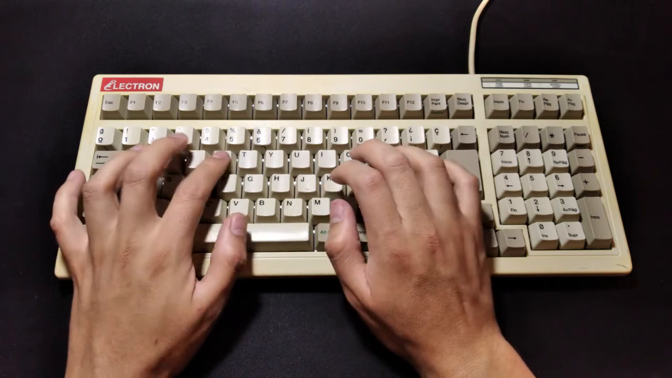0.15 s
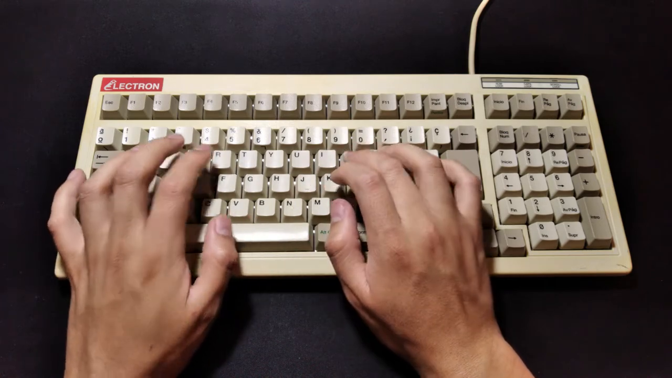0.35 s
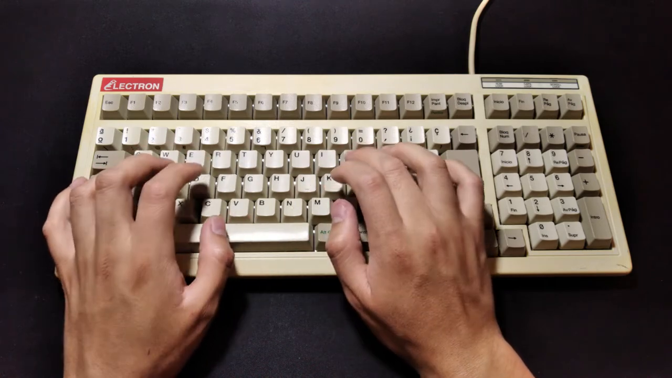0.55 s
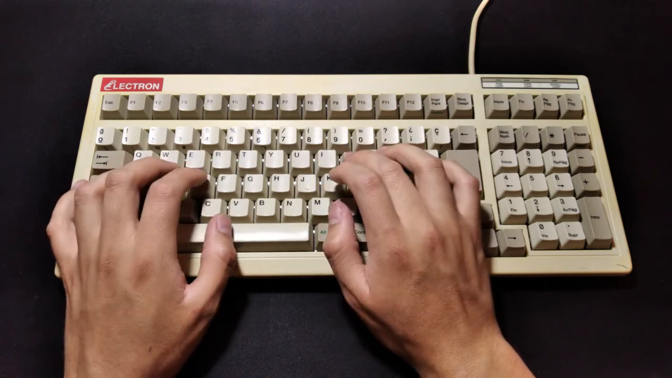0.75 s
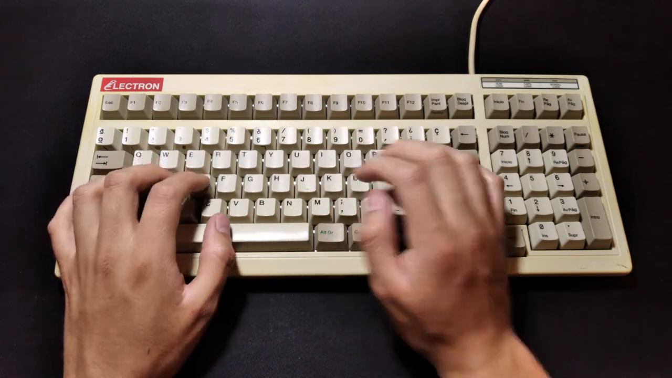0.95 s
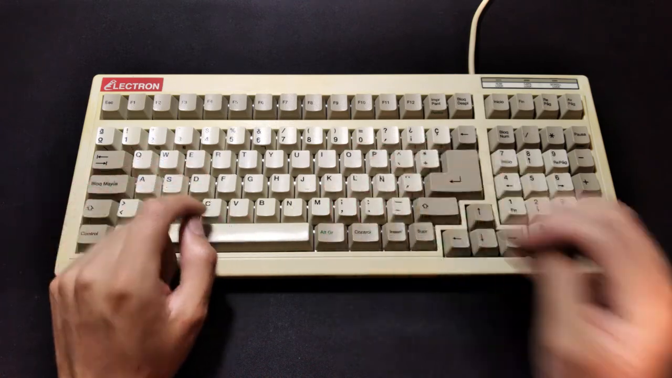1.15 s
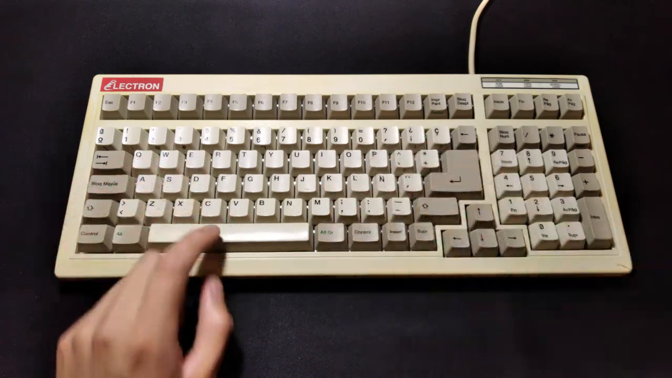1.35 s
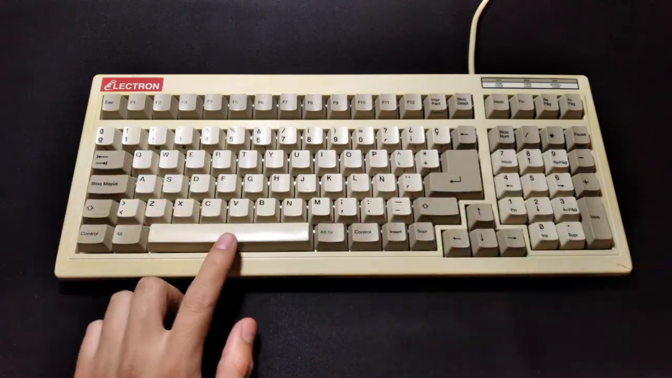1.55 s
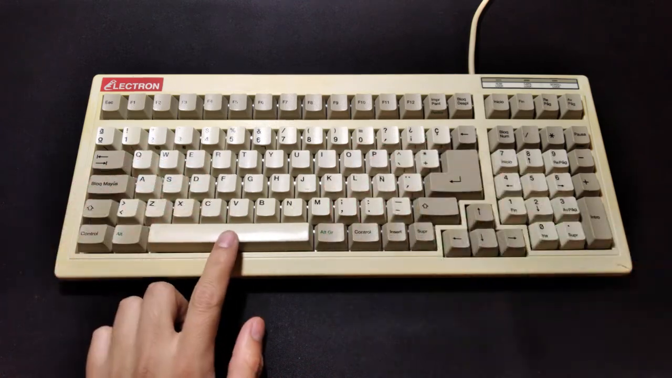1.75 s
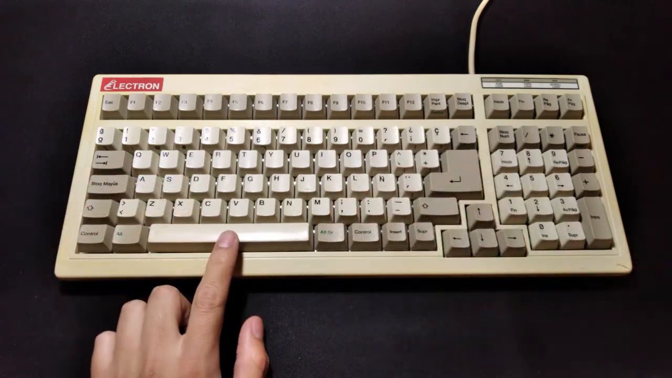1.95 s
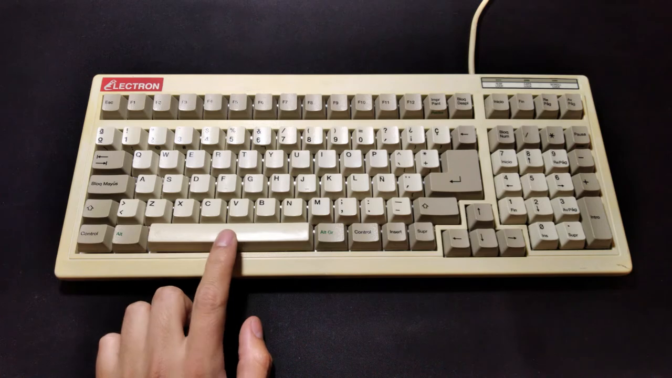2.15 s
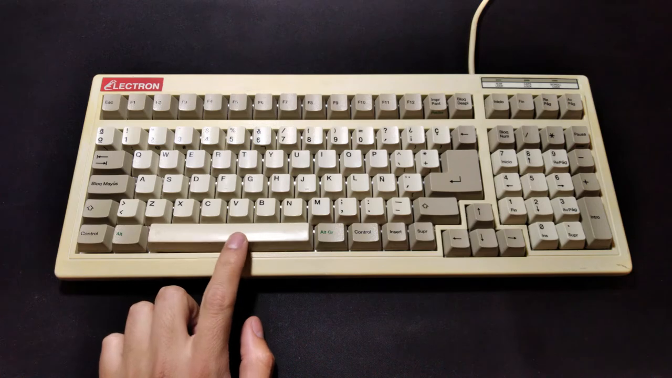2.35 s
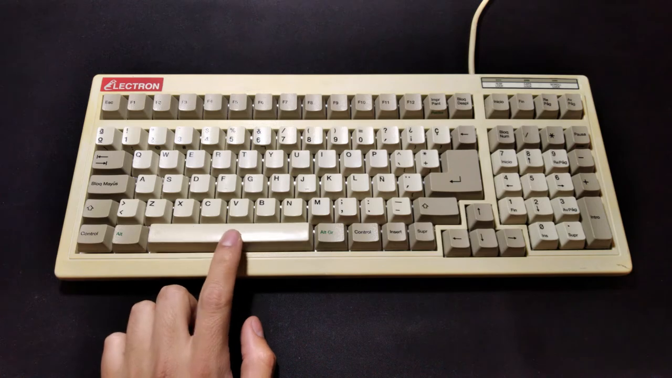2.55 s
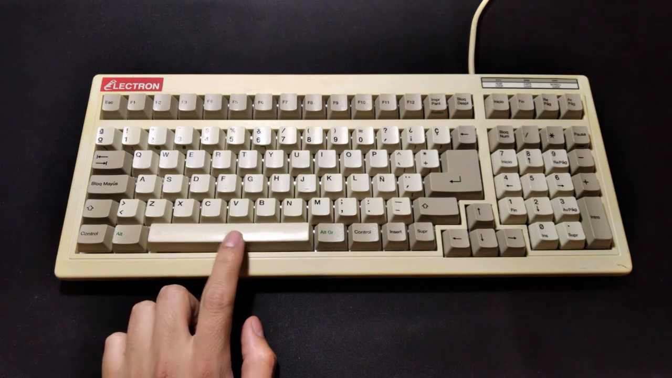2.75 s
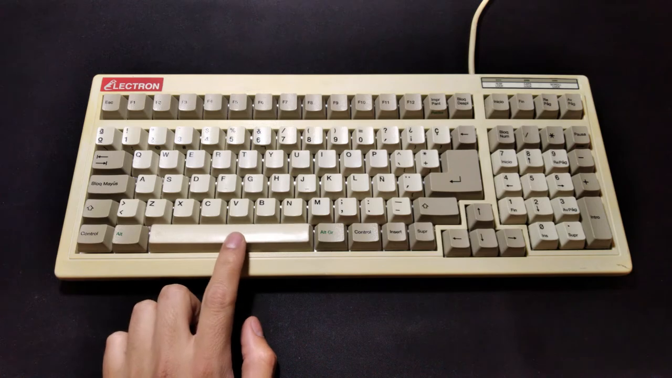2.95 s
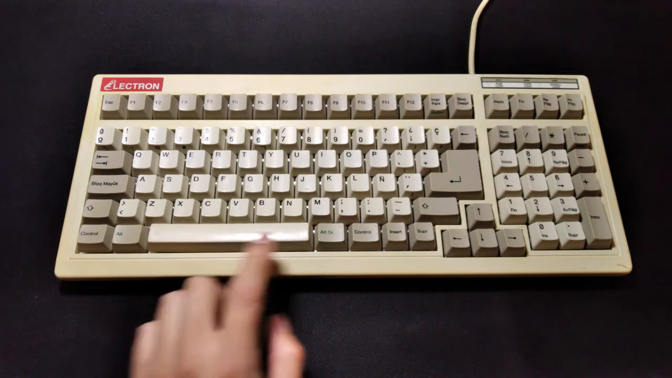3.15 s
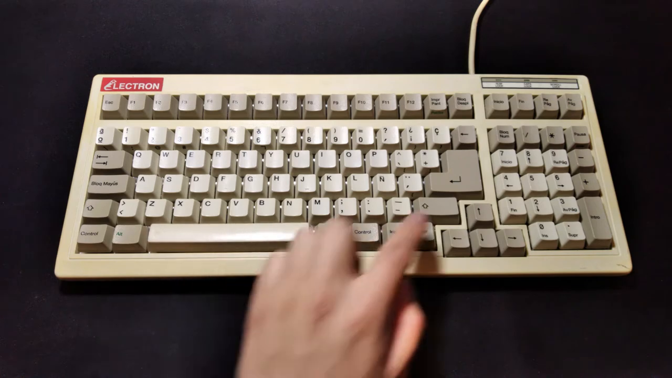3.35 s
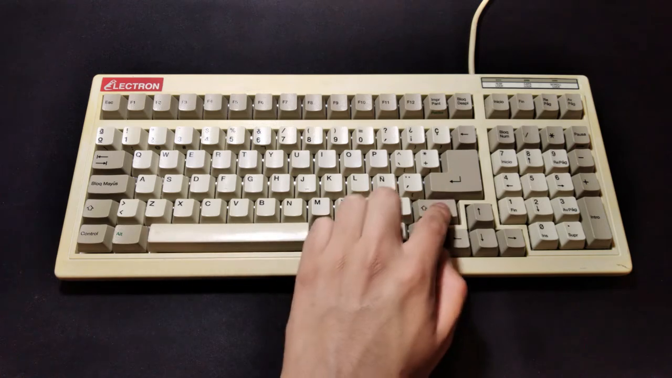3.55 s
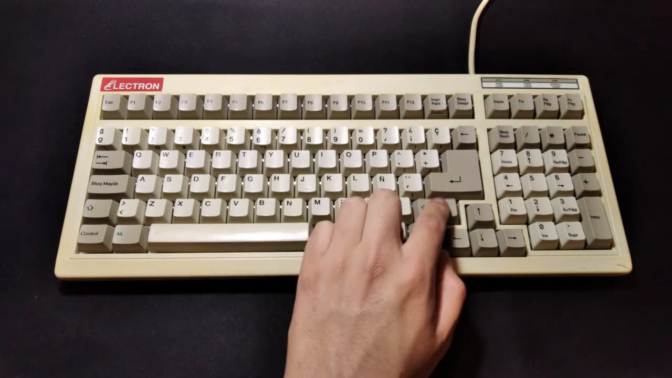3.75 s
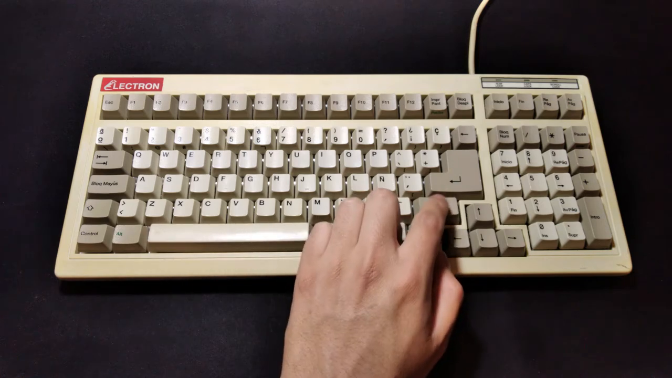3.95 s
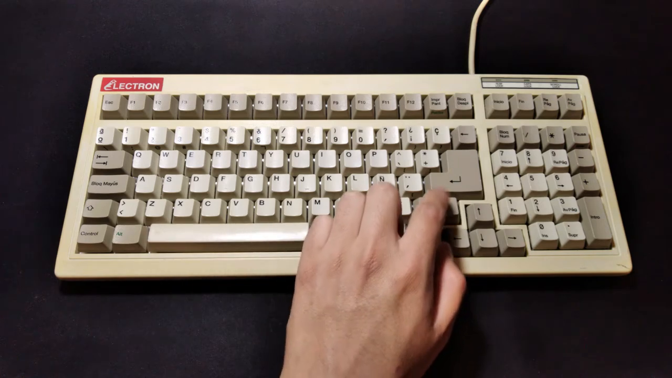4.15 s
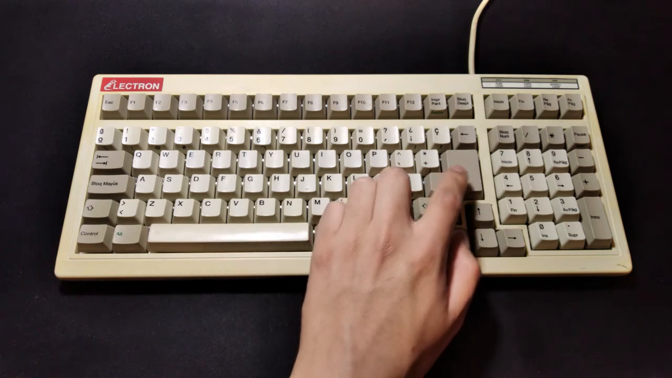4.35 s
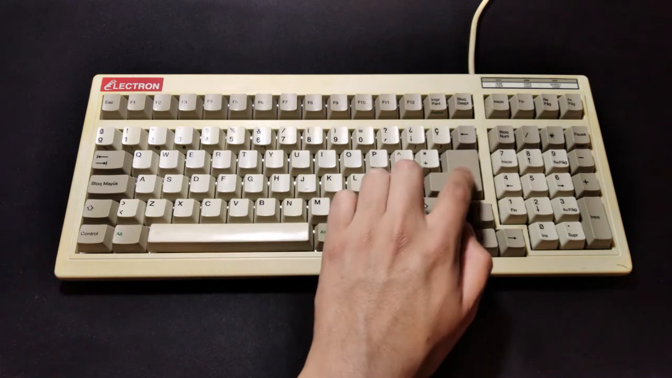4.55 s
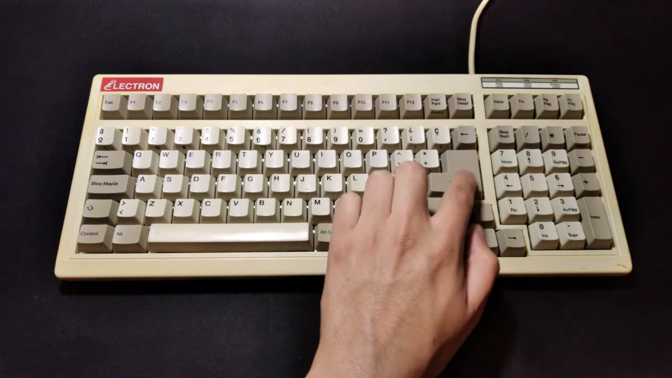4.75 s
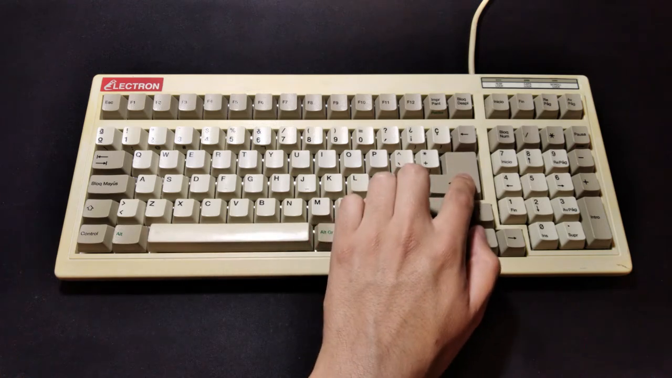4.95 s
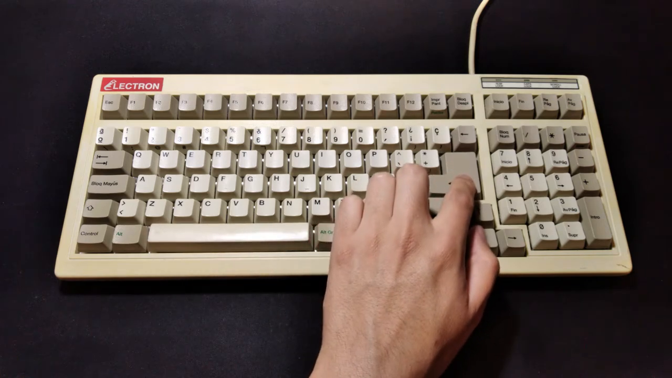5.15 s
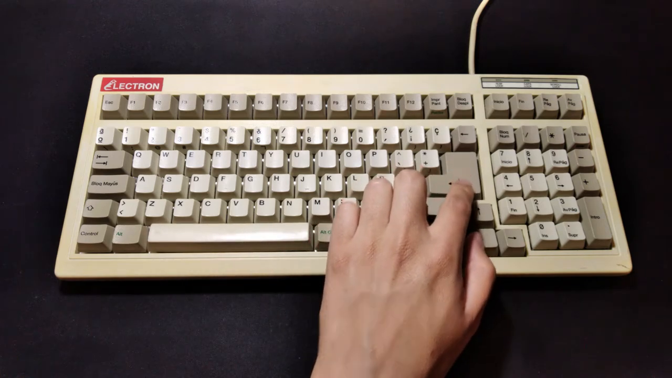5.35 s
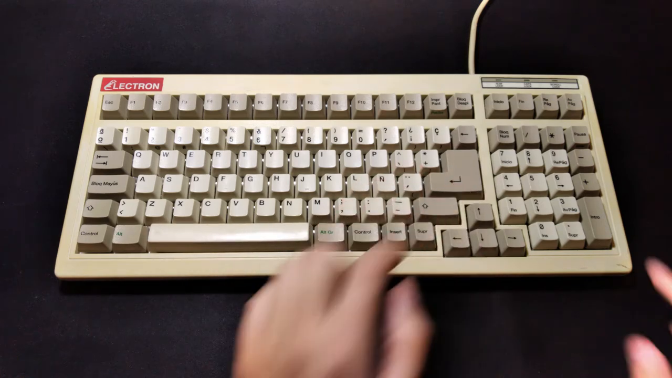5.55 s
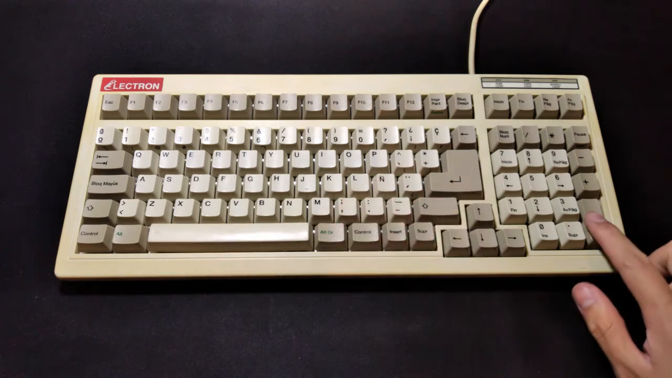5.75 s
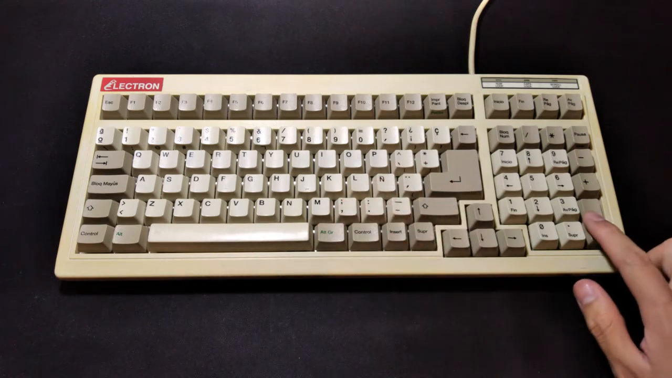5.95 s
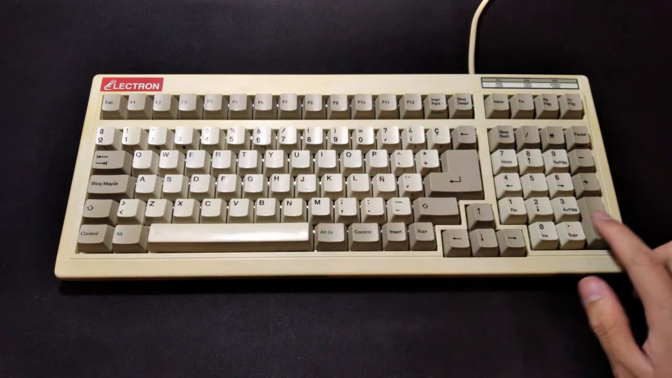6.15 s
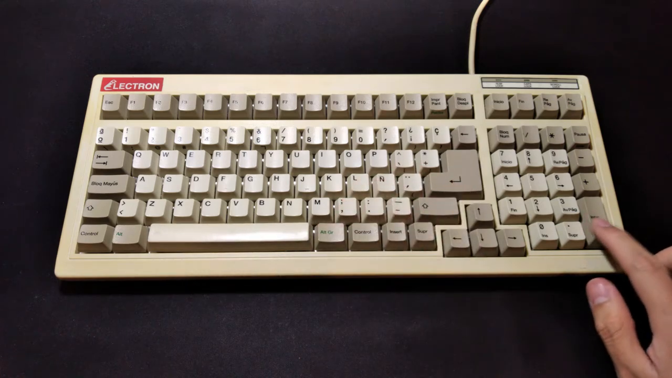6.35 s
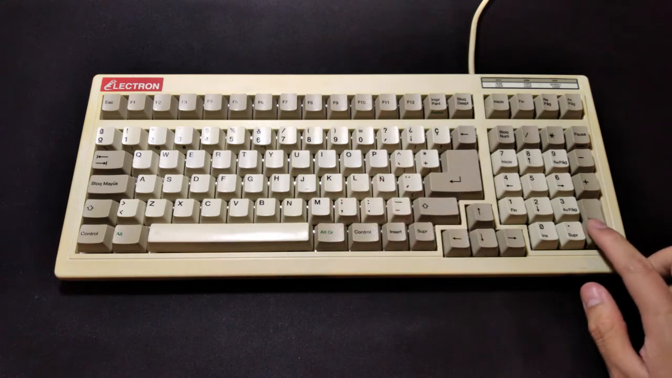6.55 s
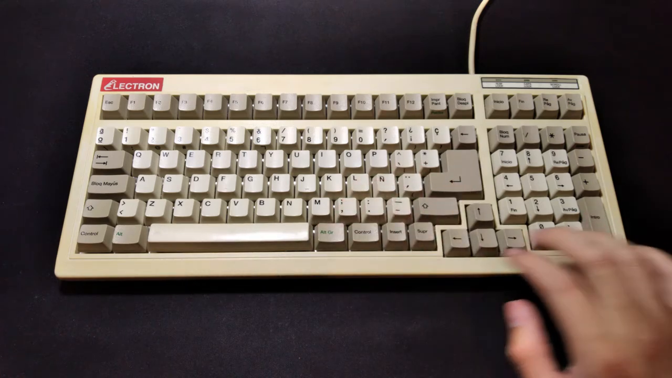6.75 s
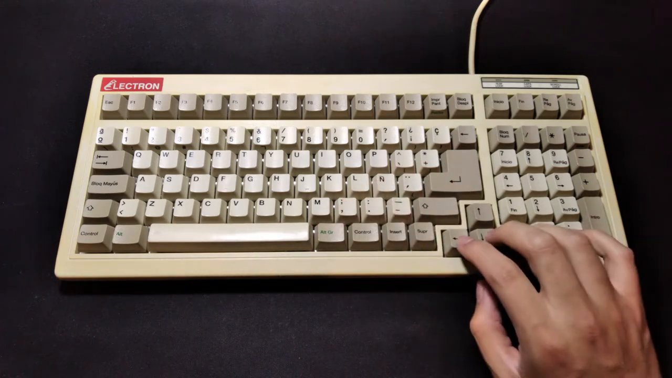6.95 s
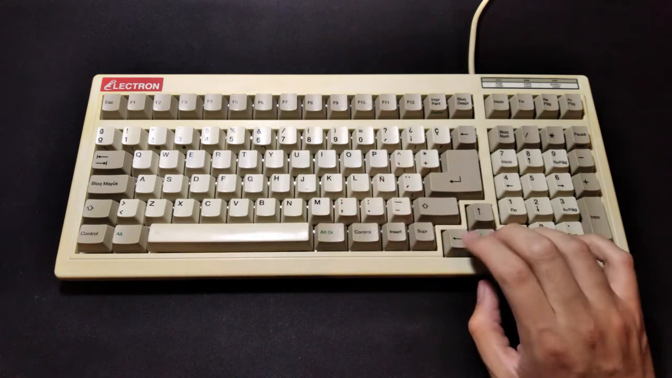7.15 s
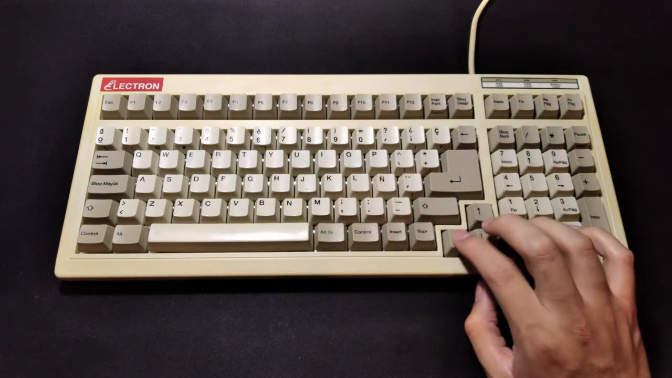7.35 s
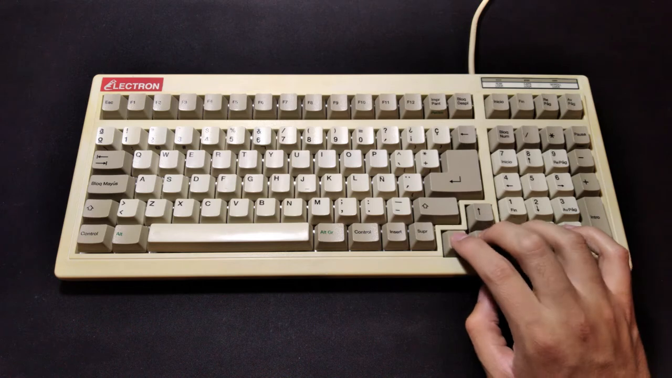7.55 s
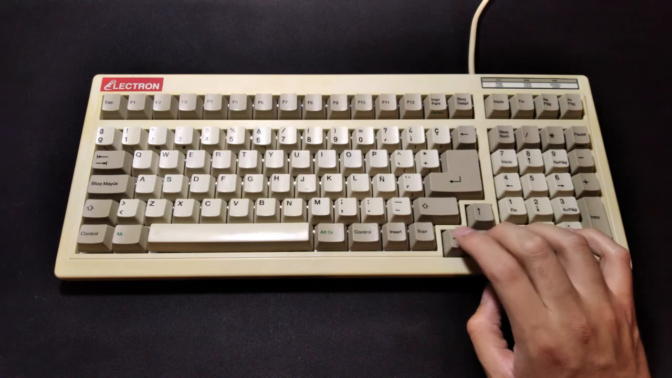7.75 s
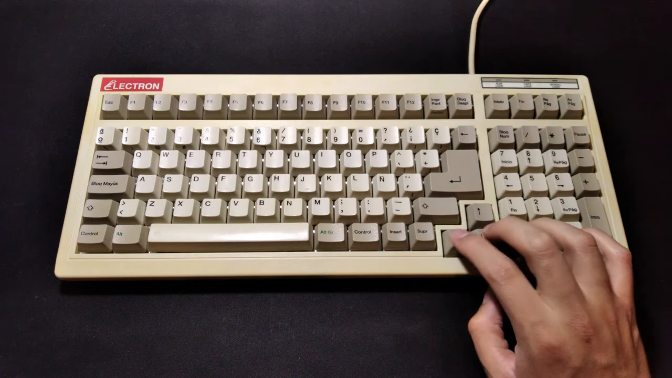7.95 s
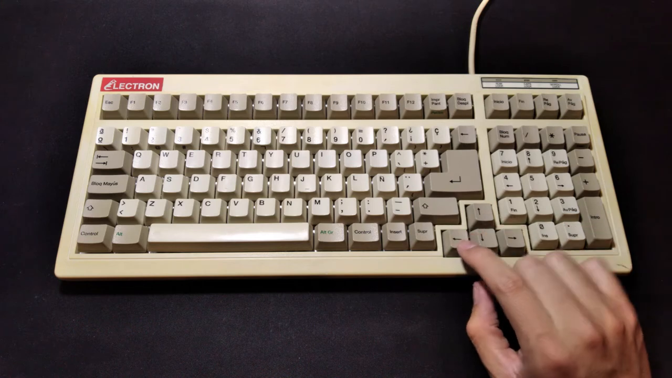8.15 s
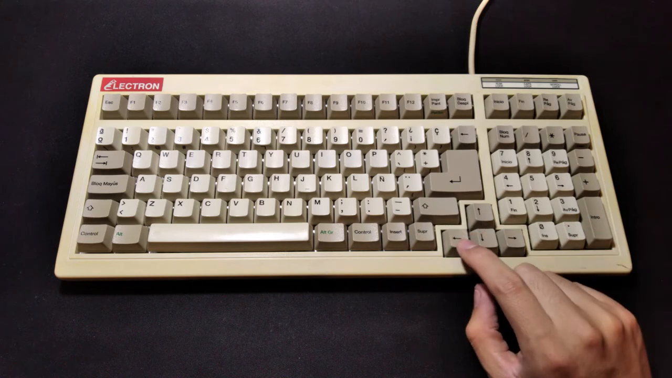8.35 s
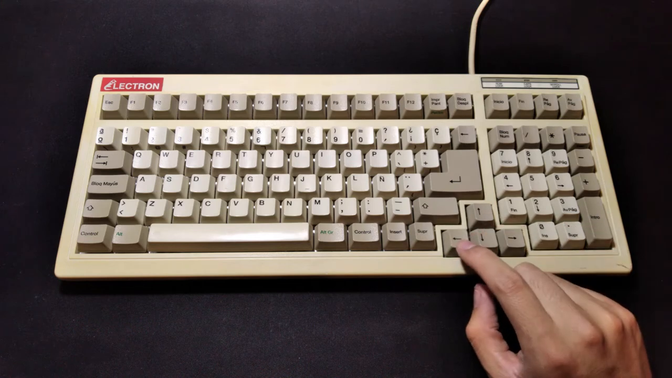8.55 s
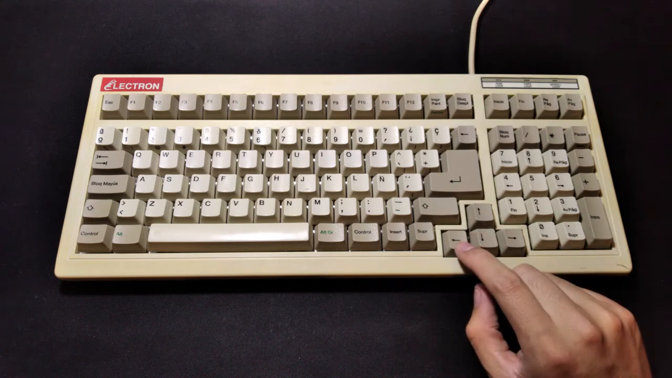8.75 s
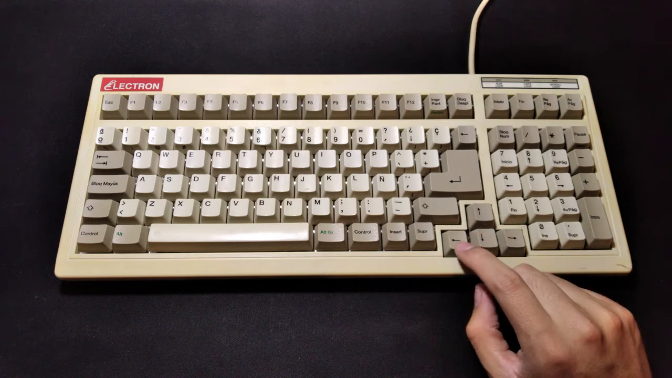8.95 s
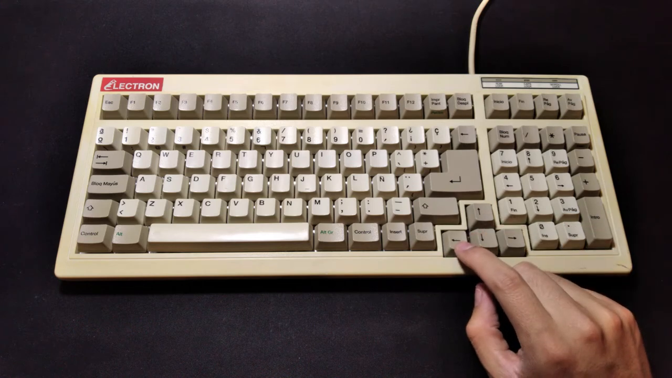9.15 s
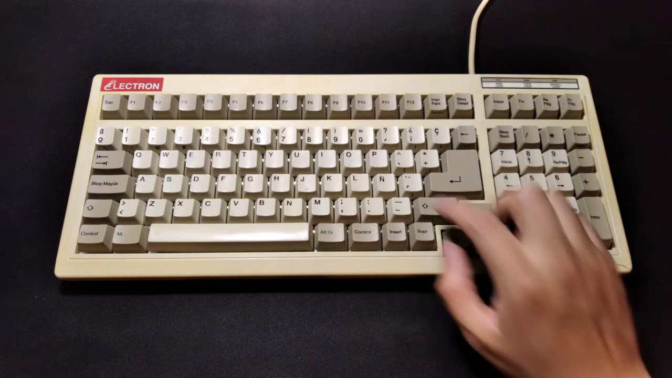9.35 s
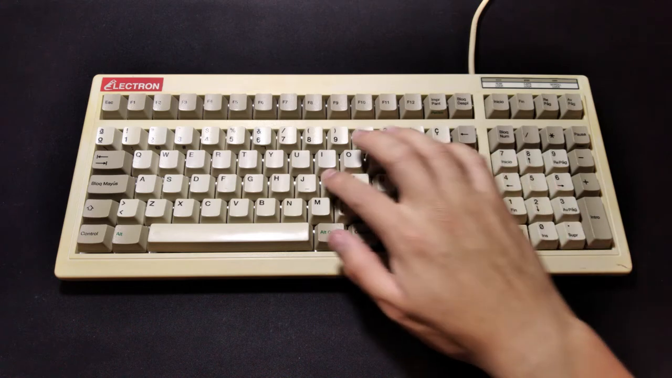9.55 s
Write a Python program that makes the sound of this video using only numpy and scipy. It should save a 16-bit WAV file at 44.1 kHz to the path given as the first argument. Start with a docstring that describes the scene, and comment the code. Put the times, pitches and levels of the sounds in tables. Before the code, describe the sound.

A short run of mechanical keyboard typing, followed by groups of repeated key taps, each with a sharp click and plastic clack.

```python
"""Clicky mechanical keyboard

An old keyboard on a desk in a small room: a run of letters, then space bar, shift, enter, number pad
and arrows tapped in turn. Each switch snaps; each keycap knocks at the bottom and top of its travel,
rattles the plastic case and thuds the desk. Underneath: low room hum, hiss, one faint sinking tone."""
import sys
import numpy as np
from scipy import signal
from scipy.fft import rfft, irfft, next_fast_len
from scipy.io import wavfile

SR = 44100
rng = np.random.default_rng(int(sys.argv[2]) if len(sys.argv) > 2 else 0)


def log_audio(samples):
    """Write samples as a 16-bit WAV file to the path given in sys.argv[1]."""
    # one column per channel
    frames = np.atleast_2d(samples).T
    # limit to full scale, then quantise
    limited = np.clip(frames, -1, 1)
    pcm = np.round(limited * 32767).astype(np.int16)
    wavfile.write(sys.argv[1], SR, pcm)


N = 427329
SIZE, LEAD = 8192, 1024  # samples per contact, samples ahead of it
HZ = np.fft.rfftfreq(SIZE, 1 / SR)
AGE_S = (np.arange(SIZE) - LEAD) / SR  # time since contact
ABOVE = [1 - 1 / (1 + (HZ / edge_hz) ** 8) for edge_hz in (1600, 5000)]
ZONES = [1 - ABOVE[0], ABOVE[0] - ABOVE[1], ABOVE[1]]  # bands of case, cap, switch

# hand position: from t/s, key kind
HAND = [(0, "space"), (0.06, "letters"), (1.8, "space"), (3.4, "shift"), (4.4, "enter"), (5.7, "pad"),
        (6.9, "arrows")]
# keys going down: bottom stop t/s, level/dB, travel from snap to stop/s, snap level/dB
PRESSES = [(0.0827, -18.5, 0.0049, -24.5), (0.139, -27.5, 0.0052, -25.5), (0.2865, -24, 0.008, -29.5),
           (0.383, -19, 0.0043, -22), (0.5745, -20.5, 0.0052, -28), (0.7229, -22, 0.0074, -29),
           (0.8533, -20.5, 0.0059, -42), (2.156, -23.5, 0.0055, -30.5), (2.3615, -24, 0.015, -33.5),
           (2.546, -23, 0.011, -30), (2.7414, -27, .0102, -32.5), (2.921, -27.5, 0.011, -29),
           (3.083, -27.5, 0.012, -29), (3.6023, -22.5, 0.0067, -24.5), (3.7956, -21.5, .0095, -33),
           (3.968, -26, 0.015, -28), (4.1161, -26, 0.0099, -25.5), (4.512, -18.5, 0.0038, -34.5),
           (4.7207, -24, 0.0095, -32), (4.8858, -23, 0.009812, -30), (5.0602, -23, 0.011, -35.5),
           (5.2248, -22, .011, -40), (5.3695, -20, 0.0071, -36.5), (5.833, -20, 0.0062, -33),
           (6.009, -21, 0.007823, -33), (6.1773, -20, 0.0091, -37.5), (6.3408, -20.5, 0.0099, -33),
           (6.549, -27.5, 0.009, -52), (6.631, -18, .0074, -32), (7.241, -23, 0.018, -32.5),
           (7.3481, -22, 0.0082, -28.5), (7.3847, -22, .002, -40), (7.47, -20.5, .002, -42),
           (7.587, -24, 0.013, -30.5), (7.688, -22, 0.0021, -40.5), (7.7917, -22.5, 0.0018, -30.5),
           (8.066, -25.5, 0.002114, -55), (8.432, -31.5, 0.01213, -41), (8.6638, -26.5, 0.0078, -39),
           (8.8954, -31.5, 0.01, -38.5), (9.097, -27.5, .008, -36), (9.314, -29.5, .0023, -40),
           (9.6798, -34, .002, -39.5)]
# keys springing back: top stop t/s, level/dB, treble/dB
RELEASES = [(0.0399, -30, -4.5), (0.186, -22, -0.5), (0.207, -25.5, 7.5), (0.4779, -24, 1),
            (0.6492, -20, -3.5), (0.7914, -25, -5), (0.918, -22.5, -0.5), (2.2562, -25, -4),
            (2.464, -31, -2), (2.6398, -26, -2), (2.8216, -27, -1), (3.009, -31.5, -2),
            (3.1988, -25.5, -1.5), (3.7051, -23, 2.5), (3.8799, -23.5, 0.5), (4.0437, -22.5, 2),
            (4.2218, -21.5, -4), (4.6298, -26, 0.5), (4.8077, -27, 1), (4.979, -27.5, 2), (5.1409, -26, 1),
            (5.2993, -25.5, 0.5), (5.486, -22, 0.5), (5.9314, -20, 0.5), (6.0962, -20, -1),
            (6.2545, -19, 1.5), (6.4126, -25, 1), (6.7108, -23.5, 2), (7.3112, -26.5, -2.5),
            (7.4024, -22, -6), (7.6517, -31.5, -5), (7.724, -25.5, 5), (7.8118, -25.5, 2),
            (7.8735, -27, -2), (7.922, -34, 1), (8.3089, -26.5, 3), (8.5416, -29.5, -5.5),
            (8.7847, -30.5, -4.5), (9.0011, -34, -2.5), (9.2153, -31.5, -3.5)]
# loose caps striking their stop again: t/s, level/dB
BOUNCES = [(0.0865, -30.5), (0.3864, -26), (0.9228, -24.5), (2.364, -34.5), (3.712, -23), (4.046, -27),
           (4.2249, -26.5), (7.392, -25), (9.331, -37)]
# switches snapping under a resting finger, short of the stop: t/s, level/dB
CLICKS = [(5.438, -43), (6.504, -39), (7.0221, -39.5), (7.0652, -35), (7.629, -31.5), (7.8996, -35),
          (8.5, -48), (8.73, -47), (8.96, -46)]
# fingertips brushing caps: t/s, level/dB
BRUSHES = [(1.185, -47.5), (7.125, -37), (7.985, -39), (8.034, -38.5), (8.184, -46), (8.225, -42.5)]

# resonances per key kind: f/Hz, width/Hz, level/dB
LETTERS = [(709.65, 630, -3.5), (1030, 700, -1.5), (1860, 360, 1.5), (2180, 180, 7), (2980, 1350, -8),
           (6620, 560, -13), (8300, 430, -16), (9800, 2900, -25.5)]
SPACE = [(230, 200, -7.5), (440, 170, -1.5), (700, 230, -4), (1160, 250, 0), (1830, 470, -1.5),
         (2770, 2000, -2), (5270, 6000, -6), (9876, 3600, -6), (12900, 1100, -8.5)]
SHIFT = [(690, 540, -6), (1160, 197.1, 2), (1500, 330, -0.5), (2008.9, 450, 2.5), (3328.7, 1600, -10),
         (4130, 220, -11.5), (7938.8, 448, -22.5), (9799, 4100, -28)]
ENTER = [(420, 110, -3), (690, 580, 1.5), (1050, 470, 3.5), (1500, 330.2, 4), (1997.6, 510, 0),
         (3474, 1300, -14.5), (6765, 7600, -25), (8150, 440, -22), (10500, 2600, -21.5)]
PAD = [(358, 200, -6), (690, 290, 3), (1096, 205.6, 9), (1350, 320, 0.5), (1926, 290, 3),
       (2443.4, 290, -10), (3880, 300, -21), (8381.3, 563, -30.5), (10400, 2231, -30.5)]
ARROWS = [(666.7, 560, -4.5), (1112, 290, -0.5), (1556, 135, 0), (2210, 590, 0), (4160, 3600, -18.5),
          (7610, 520, -9), (8700, 310, -13), (10669, 1800, -25)]
# key mounting: resonances, left lag/ms, L-R/dB, push over rattle/dB, slide/dB, desk thud/dB,
# bass delay/s, rattle t60/s
KEYS = {"letters": (LETTERS, 0.047, -0.29, -3.6, -7, -6, 0.03, 0.063),
        "space": (SPACE, 0.13, 0, -1.1, -6.5, -10.5, .028, 0.05),
        "shift": (SHIFT, -0.019, 0.31, -0.38, -6.5, -14.5, 0.01014, 0.049),
        "enter": (ENTER, -0.059, 0.64, 4.5, -8, -17, 0.01197, 0.054),
        "pad": (PAD, -0.14, 1.333, 4.1, -10, -10, 0.01202, 0.058),
        "arrows": (ARROWS, -0.02, 0, 0.61, -16, -9.5, 0.01505, 0.045)}
# switch action: leaf ring over snap/dB, reset level/dB, relative scatter of cap pitch
SWITCHES = {"letters": (2.5, -40, 0.033), "space": (1.5, -45, .02), "shift": (3.305, -34.5, .02),
            "enter": (-1.5, -44, 0.018), "pad": (12, -42, .012), "arrows": (-15, -54, 0.0277)}
# steel click leaf: f/Hz, width/Hz, t60/s
LEAF = (13800, 800, .016)
# case peaks and hollows, all keys: f/Hz, width/Hz, gain/dB
CASE = [(524, 36, -5), (701.47, 110, 5.5), (786, 97, -4), (3920, 150, 1.5)]
# offsets from press level: case/dB, cap/dB, switch/dB, finger landing/dB
DOWN_DB = {"letters": (-7.5, 1.5, -4.5, -18), "space": (0, 0.5, 4, -24.5), "shift": (1, 0.5, -6.5, -20),
           "enter": (-0.5, -0.5, -6.5, -11.5), "pad": (0, 1.2, -11.5, -24.5), "arrows": (-5.5, 1, -3, -37)}
# offsets for release, snap, brush, bounce: case/dB, cap/dB, switch/dB
UP_DB = {"letters": (-4, 1.5, -5), "space": (3.5, 0, -0.5), "shift": (2.5, -0.6234, -1.5),
         "enter": (4.5, 0.97, 1.5), "pad": (3.5, 2, -5.5), "arrows": (-7, 0.8, -5)}
SNAP_DB = (-7, -1, 3.5)
BRUSH_DB = (0, 1.5, -6.5)
BOUNCE_DB = (-2, -1.5, -4.5)
# spring squeaking once: t/s, f/Hz, width/Hz, level/dB, t60/s
SQUEAK = (8.575, 3494, 380, -33.5, 0.025)
# desk modes: f/Hz, level/dB, t60/s
DESK_MODES = [(134.5, 2.5, 0.19), (173.5, -4.5, 0.33), (246.87, 0.5, 0.15), (302.7, 6, 0.12)]
# desk boom under one space bar blow: t/s, f/Hz, level/dB, t60/s
BOOM = (2.18, 172, -30, .14)

# room decay: f/Hz, t60/s
ROOM_T60 = [(500, 0.21), (10000, 0.18)]
# hum and hiss spectra: f/Hz, relative density/dB
HUM = [(25, -43), (80, -7), (105, -14.5), (126, 2.5), (165, -9), (245, 0.5), (320, -14), (450, -15),
       (800, -68)]
HISS = [(200, -14.5), (420, 2), (4000, -20), (14000, -27)]
# sinking tone: t/s, f/Hz, level/dB
WHINE = [(6.72, 690, -57), (6.86, 668, -47.5), (6.96, 652, -52), (7.07, 639, -51)]
# stereo width of closely spaced microphones: f/Hz, side gain/dB
WIDTH = [(600, -6), (4000, 0)]
# overall colour, lower treble dipped, highest treble falling away: f/Hz, gain/dB
COLOUR = [(4150, -1), (4500, -9.5), (7500, -11), (7800, -1), (14200, -2), (14700, -9.5), (16300, -27.5)]


def typing(landing_travels=2.4, reset_lead_s=0.006, scatter_db=0.6):
    """Down: finger lands, switch snaps, cap knocks. Up: switch resets, cap knocks again."""
    track = np.zeros((2, N + 2 * SIZE))
    bodies = {kind: key_body(modes) for kind, (modes, *_) in KEYS.items()}
    tails = [rfft(room_tail()) for _ in range(40)]
    grains = {kind: 0.46 * pair(SIZE, side_db=2.0) for kind in KEYS}  # repeating part of the rattle

    def strike(kind, levels_db, **shape):
        """A contact rings key and case; only the cap's pitch shifts with how it is held."""
        shift = 1 + SWITCHES[kind][2] * rng.standard_normal() * ZONES[1]
        power = np.interp(HZ / shift, HZ, bodies[kind])
        blow = contact(kind, grains[kind], **shape)
        return irfft(placed(kind, blow, tails) * ring(power, levels_db))

    def knock(kind, levels_db):
        """The cap hits a stop; the case passes the blow to the desk."""
        *_, thud_db, delay_s, t60_s = KEYS[kind]
        scattered_db = levels_db + rng.normal(0, scatter_db, 3)
        clack = strike(kind, scattered_db, push_db=-2.5, t60_s=t60_s, slide_s=0.0023)
        return flexed(clack, delay_s) + amp(levels_db[0] + thud_db) * desk_thud()

    def switch(kind, db):
        """The click leaf buckles and rings."""
        hz, width_hz, t60_s = LEAF
        return snap(kind, db, SNAP_DB) + chirp(hz, width_hz, db + SWITCHES[kind][0], t60_s)

    def snap(kind, db, colour_db):
        """Small, hard, brief contact."""
        return strike(kind, db + np.array(colour_db), push_db=-8, t60_s=0.06, slide_s=0.0006)

    def tick(kind, db, colour_db):
        """Light contact, nearly all rattle."""
        return strike(kind, db + np.array(colour_db), push_db=-23, t60_s=0.067, slide_s=0.00054)

    for s, db, travel_s, snap_db in PRESSES:
        kind = key_at(s)
        *stop_db, landing_db = db + np.array(DOWN_DB[kind])
        add(track, s - landing_travels * travel_s, tick(kind, landing_db, SNAP_DB))
        add(track, s - travel_s, switch(kind, snap_db))
        add(track, s, knock(kind, stop_db))
    for s, db, treble_db in RELEASES:
        kind = key_at(s)
        add(track, s - reset_lead_s * rng.lognormal(0, 0.3), switch(kind, SWITCHES[kind][1]))
        add(track, s, knock(kind, db + np.array(UP_DB[kind]) + [0, 0, treble_db]))
    for s, db in BOUNCES:
        add(track, s, snap(key_at(s), db, BOUNCE_DB))
    for s, db in CLICKS:
        add(track, s, tick(key_at(s), db, SNAP_DB))
    for s, db in BRUSHES:
        add(track, s, tick(key_at(s), db, BRUSH_DB))
    add(track, SQUEAK[0], chirp(*SQUEAK[1:]))
    add(track, BOOM[0], desk_boom(*BOOM[1:]))
    return track[:, LEAD:LEAD + N]


def key_at(s):
    """Key kind under the hand."""
    return [kind for start_s, kind in HAND if start_s <= s][-1]


def contact(kind, grain, push_db, t60_s, slide_s):
    """Blow spectrum: the stem scrapes its guide, stops with one push, loose plastic rattles on."""
    key_push_db, slide_db = KEYS[kind][3:5]
    push = amp(key_push_db + push_db + along([(1800, 1), (8000, -7.5)], HZ))
    loose = (grain + pair(SIZE, side_db=-0.5)) * chatter(depth_db=6.5)
    small_share = along([(2000, 0), (6000, 0.84)], HZ)  # small switch parts settle sooner
    rattle = (1 - small_share) * rfft(burst(loose, t60_s))
    rattle += small_share * rfft(burst(loose, 0.45 * t60_s))
    stop = (push * rfft(AGE_S == 0) + rattle) / np.sqrt(1 + push ** 2)
    scrape = pair(SIZE, side_db=-7) * chatter(depth_db=6.0)
    slide = unit(scrape * (AGE_S < 0) * np.exp(-np.abs(AGE_S) / slide_s)) / np.sqrt(SIZE)
    return stop + rfft(slide) * amp(slide_db + along([(1500, -6.0), (8000, 6.0)], HZ))


def chatter(depth_db):
    """Uneven gain of loose parts touching about once a millisecond."""
    knots = np.arange(0, SIZE, 48)
    return np.interp(np.arange(SIZE), knots, amp(depth_db * rng.standard_normal(len(knots))))


def key_body(modes):
    """Power spectrum of a key mounted in the case."""
    power = sum(amp(db) ** 2 * bell(hz, width_hz) ** 1.5 for hz, width_hz, db in modes)
    case_db = sum(db * bell(hz, width_hz) for hz, width_hz, db in CASE)
    return power * amp(case_db) ** 2


def ring(power, levels_db, partial_db=8):
    """Response of case, cap and switch; each landing brings out other narrow partials."""
    partials_hz = np.exp(rng.uniform(np.log(2300), np.log(14000), size=(12, 1)))
    power = power * amp(partial_db * bell(partials_hz, partials_hz / 40).max(axis=0)) ** 2
    shares = sum(zone * amp(db) ** 2 / np.mean(zone * power) for zone, db in zip(ZONES, levels_db))
    return causal(np.sqrt(np.abs(power * shares) * 0.008 * SR))


def flexed(x, delay_s, corner_hz=309.8):
    """Low bending waves cross the desk slowly, so a knock sweeps downward."""
    group_delay_s = delay_s / (1 + (HZ / corner_hz) ** 4)
    return irfft(rfft(x) * np.exp(-2j * np.pi * np.cumsum(group_delay_s) * HZ[1]))


def chirp(hz, width_hz, db, t60_s):
    """Leaf ring or spring squeak: a short burst into one narrow resonance."""
    drive = burst(pair(SIZE, side_db=-5.5), t60_s)
    sound = irfft(rfft(drive) * causal(bell(hz, width_hz)))
    return amp(db) * sound / np.abs(sound).max()


def desk_thud(rise_s=0.018):
    """Low desk modes, driven through the keyboard's feet."""
    t = np.maximum(AGE_S, 0)
    modes = np.zeros(SIZE)
    for hz, db, t60_s in DESK_MODES:
        decay = amp(db + rng.normal(0, 2.1) - 60 * t / t60_s)
        modes += decay * np.sin(2 * np.pi * hz * rng.normal(1, 0.051) * t)
    return modes * (1 - np.exp(-t / rise_s)) * amp([[0], [-5]])


def desk_boom(hz, db, t60_s):
    """One low desk mode swells and dies."""
    swell = np.maximum(AGE_S, 0) / t60_s * np.log(1000)
    return amp(db) * swell * np.exp(1 - swell) * np.sin(2 * np.pi * hz * AGE_S) * amp([[0], [-5]])


def placed(kind, blow, tails, room_db=-6.5):
    """The key's place sets lag and balance between the microphones; the room adds a tail."""
    lag_ms, pan_db = KEYS[kind][1:3]
    lag = np.exp(np.outer([-1, 1], 1j * np.pi * HZ * lag_ms / 1000))
    left, right = blow * lag + amp(room_db) * tails[rng.integers(len(tails))]
    mid = (left + right) / 2
    side = (left - right) / 2 * amp(along(WIDTH, HZ))
    return np.array([mid + side, mid - side]) * amp([[pan_db / 2], [-pan_db / 2]])


def room_tail(rise_s=0.0029):
    """Diffuse echo, unrelated left and right; treble dies first."""
    hz, t, noise = signal.stft(rng.standard_normal((2, SIZE)), SR, nperseg=256)
    decay = amp(-60 * t / along(ROOM_T60, hz)[:, None])
    tail = signal.istft(noise * decay, SR, nperseg=256)[1][:, :SIZE]
    return unit(np.roll(tail, LEAD, axis=1) * np.clip(AGE_S / rise_s, 0, 1)) / np.sqrt(SIZE)


def room_noise():
    """Low hum, stronger on the left, and soft hiss."""
    hum = unit(filtered(pair(N, side_db=-9.5), lambda hz: amp(along(HUM, hz))))
    hiss = unit(filtered(pair(N, side_db=-2.0), lambda hz: amp(along(HISS, hz))))
    return amp([[-45], [-51]]) * hum + amp(-50) * hiss


def whine():
    """One faint tone sinks in a pause."""
    s, hz, db = np.transpose(WHINE)
    t = np.arange(N) / SR
    envelope = amp(np.interp(t, s, db)) * (t > s[0]) * (t < s[-1])
    return envelope * np.sin(2 * np.pi * np.cumsum(np.interp(t, s, hz)) / SR)


def amp(db):
    """dB to gain."""
    return np.exp(np.asarray(db) * (np.log(10) / 20))


def unit(x):
    """Scale to rms 1."""
    return x / np.sqrt(np.mean(x ** 2) + 1e-20)


def along(points, hz):
    """Interpolate (f/Hz, value) points on a log axis."""
    knots_hz, values = np.transpose(points)
    return np.interp(np.log(hz + 1), np.log(knots_hz + 1), values)


def filtered(x, gain):
    """Zero-phase filter by gain(f/Hz)."""
    size = next_fast_len(N + SIZE)
    return irfft(rfft(x, size) * gain(np.fft.rfftfreq(size, 1 / SR)), size)[..., :N]


def causal(gain):
    """Minimum-phase spectrum: rings only after the strike."""
    cepstrum = irfft(np.log(np.maximum(gain, 1e-6)))
    cepstrum[1:SIZE // 2] *= 2
    cepstrum[SIZE // 2 + 1:] = 0
    return np.exp(rfft(cepstrum))


def bell(hz, width_hz):
    """Power curve of one resonance, peak 1."""
    return 1 / (1 + ((HZ ** 2 - hz ** 2) / (HZ * width_hz + 1e-9)) ** 2)


def pair(size, side_db):
    """Stereo noise, side at side_db re mid."""
    mid, side = rng.standard_normal((2, size))
    return unit(np.array([mid + amp(side_db) * side, mid - amp(side_db) * side]))


def burst(noise, t60_s):
    """Noise decaying from the contact, energy 1."""
    return unit(noise * (AGE_S > 0) * amp(-60 * np.abs(AGE_S) / t60_s)) / np.sqrt(SIZE)


def add(track, s, sound):
    """Mix in one contact at time s."""
    start = round(s * SR)
    track[:, start:start + SIZE] += sound


def scene():
    """The keyboard in its room."""
    return typing() + room_noise() + whine()


def record(dry):
    """Recording colour: dip in the lower treble, highest treble cut off."""
    impulse = irfft(causal(amp(along(COLOUR, HZ))))
    coloured = signal.fftconvolve(dry, impulse[None], axes=1)[:, :N]
    return filtered(coloured, lambda hz: hz < 16800)


dry = scene()
out = record(dry)
log_audio(out)
```